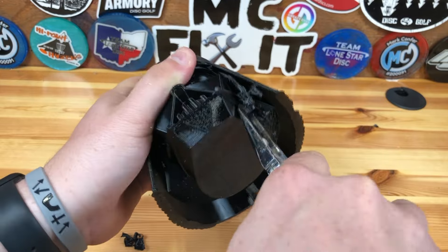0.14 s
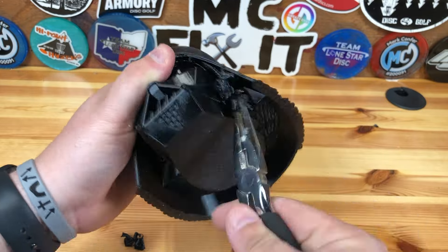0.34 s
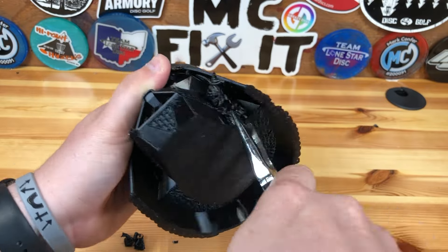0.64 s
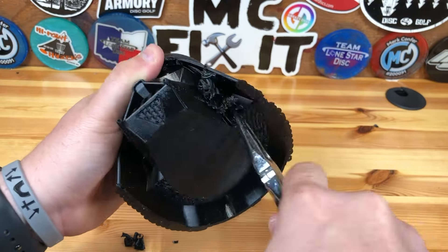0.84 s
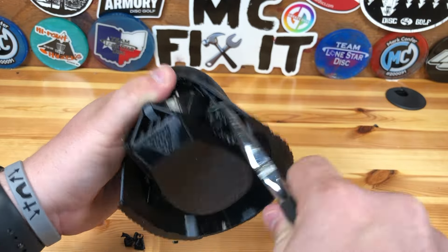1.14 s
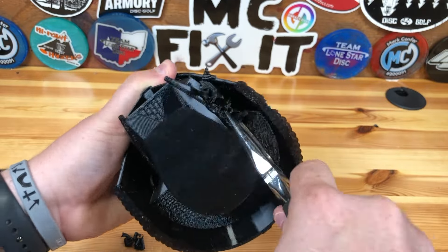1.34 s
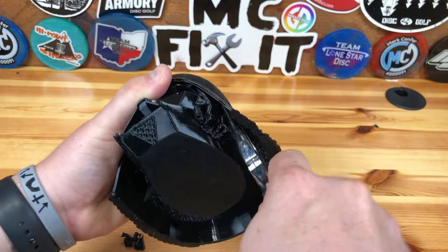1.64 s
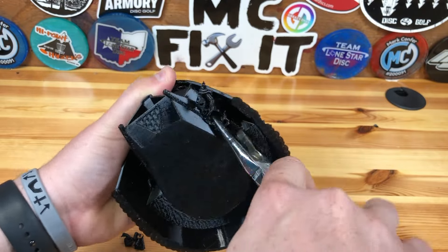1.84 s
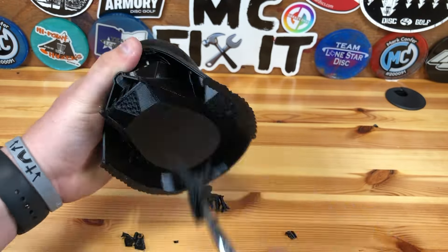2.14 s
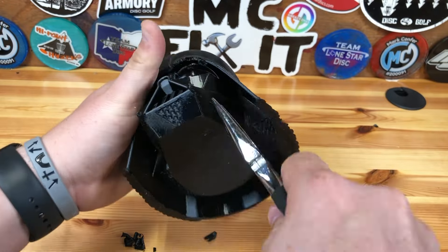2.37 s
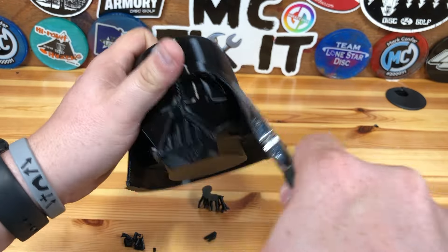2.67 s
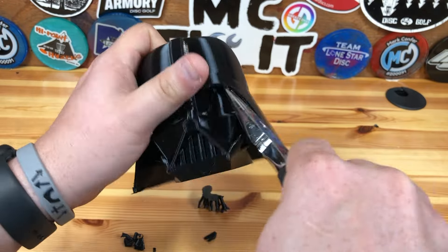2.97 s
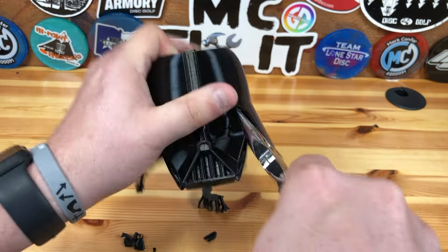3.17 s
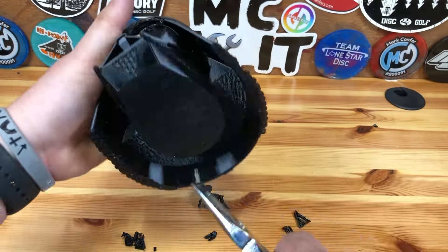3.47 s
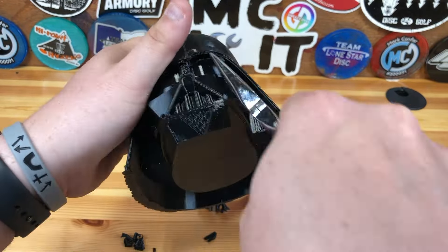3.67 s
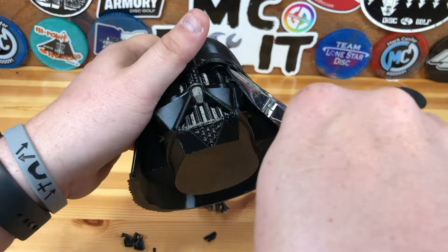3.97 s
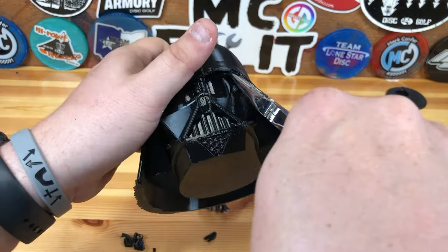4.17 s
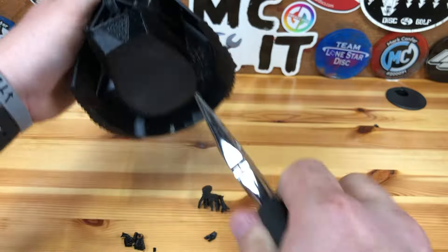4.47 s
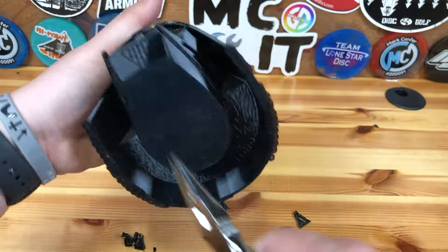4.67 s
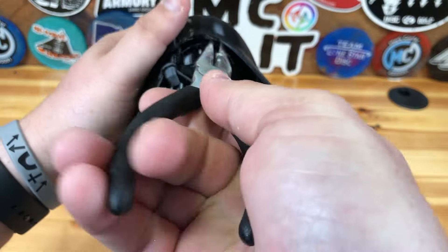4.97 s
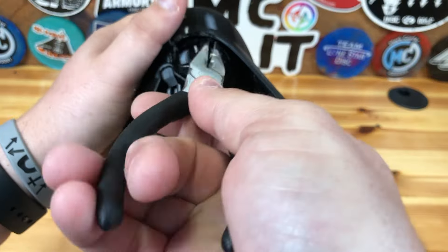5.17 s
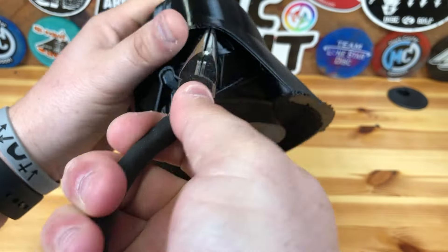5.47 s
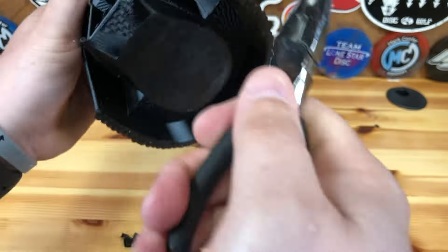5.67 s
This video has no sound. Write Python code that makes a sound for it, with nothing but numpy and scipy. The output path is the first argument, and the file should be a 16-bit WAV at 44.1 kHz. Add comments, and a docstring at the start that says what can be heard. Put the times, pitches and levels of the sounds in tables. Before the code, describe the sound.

Close dry cracks and scrapes of brittle plastic tearing from a hollow shell, dense for two seconds, then quieter knocks and occasional snaps.

```python
"""Pliers snapping supports off a plastic shell

Steel pliers twist and tear thin supports off a hollow 3D-printed plastic shell, held in one hand over a workbench.
Each snap is a short cluster of tiny fractures: they crack directly, ring the shell wall and knock its hollow body.
Between snaps the jaws tap, squeak and scrape over the print layers, bent supports creak and the hand rubs the
shell. Filtered impulses make these sounds; low noise and two wandering sines make the faint hum of a small room."""
import sys
import numpy as np
from scipy import signal
from scipy.fft import rfft, irfft, next_fast_len
from scipy.io import wavfile
from scipy.ndimage import uniform_filter1d, minimum_filter1d, map_coordinates

SR = 44100
rng = np.random.default_rng(int(sys.argv[2]) if len(sys.argv) > 2 else 0)


def bounce(signal):
    """Save signal as a 16-bit WAV file at the path given by the first command-line argument."""
    frames = np.transpose(np.atleast_2d(signal))
    limited = np.clip(frames, -1, 1)
    pcm = np.round(limited * 32767).astype(np.int16)
    wavfile.write(sys.argv[1], SR, pcm)


N = 256662

# Hollow body, damped by the hand. Each row: pitch in Hz, width in Hz, typical level in dB rim up, same face up.
BODY_MODES = [(219, 79.5, 2.5, -1.5), (339.3, 78, 6.5, 2), (483, 213, -0.5, 0), (602, 110, 2, 0.5),
              (782, 120, -6, -1.5), (890, 720, -12.5, -8.5)]
# Shell wall. Each row: pitch in Hz, width in Hz, typical level in dB rim up, same face up.
WALL_MODES = [(1276, 93, -15.5, -25), (1464, 68, -7, -24), (2124, 290, -9.5, -5), (3040, 280, -4, -5),
              (3020, 47, -11.5, -22.5), (4360, 170, -11.5, -12.5)]
# The wall's many heavily damped modes, blended into one smooth spectrum. Each row: frequency in Hz, dB per Hz.
WALL_BLEND = [(500, -32.5), (1100, -18.5), (2300, -17), (3500, -19), (5000, -15), (8000, -33.5),
              (12000, -30.5)]
# Thin support struts. Each row: typical pitch in Hz, width in Hz, relative level in dB.
STRUT_MODES = [(3930, 350, 3.5), (6000, 87, -11), (5620, 460, 2), (7820, 210, -10.5), (7905, 140, 1.5),
               (7950, 160, -10.5), (9280, 110, -18.5), (11370, 110, -3)]
# Spectrum of a fracture. Each row: frequency in Hz, relative dB per Hz.
CRACK_SPECTRUM = [(600, -34), (1500, -26.5), (3000, -3.5), (4500, 0), (8000, 8), (11000, 8), (12500, -3.5),
                  (15000, -37.5)]
# How far the shell is turned over. Each row: time in seconds, position from 0 (rim up) to 1 (face up).
FACE_UP = [(2.1, 0.16), (2.6, 1)]
# Supports breaking. Each row: main break in seconds, relative build-up time, relative die-away time,
# wall ring in dB, crack in dB before its trim, body knock in dB, leading wall pitch in Hz.
SNAPS = [(0.181, 0.0068, 0.0025, -51.5, -46.5, -48.5, 2150),
         (0.2132, 0.0026, 0.0037, -46.5, -38.5, -56.5, 2280),
         (0.2242, 0.0023, 0.0019, -43, -31.5, -60.5, 2120), (0.2337, 0.0028, 0.0024, -44, -44, -61, 2550),
         (0.2421, 0.00078, 0.0022, -49.5, -37, -65, 2730), (0.255, 0.0012, 0.0063, -36.5, -31, -70.5, 2960),
         (0.266, 0.0057, 0.0078, -42.5, -36, -56.0, 2170), (0.3466, 0.00098, 0.001, -52.5, -37, -71, 2660),
         (0.3603, 0.0014, 0.004, -55, -52, -71, 2290), (0.386, 0.0033, 0.0012, -37.0, -34.0, -58.5, 2614),
         (0.4309, 0.0045, 0.0058, -35.5, -32, -66, 2520), (0.4433, 0.0034, 0.0038, -25, -29, -55.5, 2240),
         (0.452, 0.0037, 0.0017, -38, -38.5, -59.5, 2038), (0.555, 0.0033, 0.0011, -56.5, -60, -81, 2640),
         (0.6155, 0.0018, 0.0017, -49, -77, -70.5, 2270), (0.6597, 0.001, 0.0025, -50, -64, -60, 2700),
         (0.6705, 0.0078, 0.0025, -54, -47.0, -51.5, 2500), (0.734, 0.0012, 0.0013, -71, -54.5, -80, 2340),
         (0.8423, 0.0034, 0.0075, -41.0, -36, -44.5, 2280), (0.8551, 0.0022, 0.0055, -39.5, -36, -50, 3100),
         (0.898, 0.0017, 0.0037, -43.5, -47.5, -53.0, 2970),
         (1.0036, 0.00099, 0.0033, -59, -54.5, -74, 2300),
         (1.0462, 0.00082, 0.0038, -62.5, -53, -66.5, 3170), (1.1, 0.0035, 0.0019, -46, -41, -50, 2620),
         (1.112, 0.0037, 0.0038, -30.5, -27.5, -49.5, 2480), (1.1554, 0.0025, 0.007, -29, -42, -61, 2300),
         (1.2879, 0.0016, 0.0037, -53, -56.5, -62.0, 3200), (1.3308, 0.00071, 0.0038, -47, -42, -53, 2390),
         (1.378, 0.00057, 0.0074, -44.5, -43.5, -52.5, 2820),
         (1.397, 0.0017, 0.001, -46.5, -43.0, -59.5, 2300),
         (1.4146, 0.00027, 0.0023, -39.0, -49, -58, 2240),
         (1.4751, 0.0027, 0.0062, -40, -42.5, -50.5, 2170), (1.5065, 0.0081, 0.0037, -37.5, -41, -50, 2260),
         (1.513, 0.0027, 0.0043, -35, -38.5, -53.5, 2950), (1.614, 0.0013, 0.0017, -54, -56, -79, 2330),
         (1.7223, 0.0083, 0.0072, -47, -49.5, -57, 2180),
         (1.8368, 0.0053, 0.005, -49.5, -49.5, -57.5, 2400),
         (1.909, 0.0013, 0.0074, -56.5, -50.5, -58, 2440),
         (1.9717, 0.004, 0.0041, -45.5, -40.0, -51.5, 2420), (1.985, 0.01, 0.0074, -43, -40.5, -63, 2760),
         (2.0329, 0.00038, 0.0055, -38.5, -38, -58.5, 2820),
         (2.0481, 0.0034, 0.0027, -30.5, -37.5, -44.5, 2640),
         (2.0546, 0.0035, 0.0033, -35.5, -32, -55, 3070),
         (2.0684, 0.0028, 0.0084, -30.5, -39.5, -53.0, 2050), (2.0819, 0.0022, 0.0032, -34, -32, -58, 2700),
         (2.274, 0.0013, 0.0024, -61, -52, -75, 2840), (2.667, 0.0012, 0.0077, -54, -53.0, -62.5, 2230),
         (2.6843, 0.0011, 0.001, -58.5, -59, -83, 2340), (2.9207, 0.0039, 0.0061, -63, -60.5, -66, 2230),
         (3.275, 0.0033, 0.011, -58.5, -59, -75, 2250), (3.3137, 0.0016, 0.0094, -51, -48, -59.5, 2320),
         (3.3311, 0.0013, 0.0016, -38.5, -36, -55.5, 2350), (3.7749, 0.0068, 0.0067, -65, -55.5, -82, 2750),
         (4.332, 0.00058, 0.0052, -48.5, -53, -62, 2330), (4.4044, 0.0033, 0.0011, -33.5, -33, -53, 2534),
         (4.409, 0.00054, 0.0072, -52, -56, -47.5, 2540), (4.4821, 0.0025, 0.0035, -59, -60.5, -81, 3200),
         (4.494, 0.0006, 0.0017, -60.5, -56.5, -64.5, 1830),
         (5.6178, 0.0028, 0.002, -51.0, -59.5, -64, 2870), (5.652, 0.0022, 0.008, -71, -60, -90, 3080)]
# Jaws and fingers knocking the shell. Each row: main contact in seconds, relative build-up time,
# body knock in dB before the trim of the taps, wall ring in dB before the same trim, leading wall pitch in Hz.
TAPS = [(0.0144, 0.01, -55.5, -54.5, 2580), (0.081, 0.002, -62.5, -67, 1970),
        (0.697, 0.0043, -49.5, -67, 1740), (1.0174, 0.0012, -63.5, -58, 2130),
        (1.344, 0.0072, -56.5, -44, 2320), (1.7949, 0.0022, -49.5, -78, 1870),
        (2.4025, 0.0018, -49.0, -59.5, 2480), (2.477, 0.00041, -53.5, -59, 2410),
        (2.5384, 0.0071, -55.5, -60.5, 2520), (2.562, 0.0028, -55.5, -59.5, 2140),
        (2.6316, 0.0044, -54.5, -54, 2620), (2.7242, 0.00046, -48, -44, 2640),
        (2.8076, 0.0035, -52.5, -56, 2305), (2.8648, 0.0017, -65.5, -52, 2123),
        (2.8868, 0.0042, -55.5, -71, 2030), (3.1304, 0.002, -54, -47.5, 2430),
        (3.173, 0.0042, -69, -55, 2340), (3.668, 0.0029, -58, -50.5, 2340),
        (3.7217, 0.0011, -58.5, -59.5, 2610), (3.827, 0.0038, -61.5, -62.5, 2400),
        (4.0507, 0.0051, -59.5, -70, 2506), (4.0877, 0.0025, -59, -73, 2250),
        (4.1243, 0.0005, -47.5, -43, 2130), (4.1442, 0.0076, -55, -61.5, 2280),
        (4.1748, 0.0044, -72, -55.5, 2290), (4.8205, 0.0068, -50, -49, 1987),
        (4.8734, 0.0068, -59.5, -57.5, 2020), (4.925, 0.0025, -66, -59.5, 2670),
        (4.9486, 0.0028, -58.5, -55, 2365), (4.9861, 0.0016, -62.0, -58.5, 2010),
        (5.122, 0.001, -67, -63.5, 2360), (5.2, 0.0034, -52, -44.5, 2030),
        (5.2648, 0.0037, -55, -58.5, 2385), (5.3467, 0.0025, -62.5, -71, 2260),
        (5.4227, 0.0039, -59, -60, 2317), (5.6042, 0.0032, -55.5, -53, 3000)]
# Jaws slipping on the wall. Each row: main slip in seconds, relative length, ring level in dB, leading pitch in Hz.
SQUEAKS = [(2.982, 0.0055, -50, 2220), (2.993, 0.0027, -47.5, 2100), (3.036, 0.0083, -43, 2020),
           (3.053, 0.0036, -46, 2040), (3.073, 0.013, -47, 2080), (3.125, 0.0031, -48, 2120),
           (3.955, 0.011, -77, 1830)]
# Bending supports, pitch sinking as they give. Each row: start in seconds, length in seconds, level in dB,
# first pitch in Hz, last pitch in Hz.
CREAKS = [(0.263, 0.049, -62.5, 1900, 1500), (0.59, 0.061, -57.5, 2600, 1430),
          (0.681, 0.024, -61, 3400, 1590), (0.774, 0.012, -62.5, 2200, 1440),
          (1.145, 0.025, -40, 2700, 1650), (1.165, 0.051, -56, 2350, 2112)]
# Strokes of the pliers, the other hand bracing the shell. Each row: start in seconds, length in seconds before
# the release, jaw scrape in dB before its trim, hand rub in dB before its trim.
STROKES = [(0.0, .035, -70.5, -54.5), (0.069, 0.0086, -85, -59), (0.137, 0.054, -61, -76),
           (0.2, 0.095, -45.5, -86), (0.31, 0.11, -47, -75), (0.491, 0.073, -68, -92),
           (0.612, 0.072, -52, -55.5), (0.706, 0.026, -65, -72), (0.753, 0.074, -62, -59),
           (0.864, 0.059, -66, -65), (0.94, .055, -58.5, -81), (1.132, 0.042, -45.5, -63.5),
           (1.199, 0.14, -61.5, -84), (1.311, 0.091, -59, -56.5), (1.482, 0.041, -48, -54.5),
           (1.581, 0.038, -57.5, -87), (1.654, 0.037, -73.5, -81), (1.702, 0.075, -78, -60.5),
           (1.846, 0.021, -48.5, -50.5), (1.887, 0.023, -62, -57), (1.946, 0.045, -50, -50.5),
           (2.014, 0.074, -51, -59), (2.115, 0.022, -60, -97), (2.224, 0.038, -69, -80),
           (2.474, 0.14, -79.5, -65), (2.576, 0.067, -93, -83), (2.725, 0.014, -62.5, -86),
           (2.847, 0.068, -68.5, -60.5), (2.972, 0.11, -61, -66), (3.109, 0.015, -71, -60),
           (3.15, 0.096, -71, -83), (3.364, 0.041, -78.5, -84), (3.653, 0.017, -68, -72),
           (3.74, 0.057, -66, -71), (4.042, 0.17, -85, -69), (4.244, 0.032, -75.5, -70),
           (4.354, 0.066, -59, -69), (4.455, 0.13, -79, -96), (4.799, 0.092, -75.5, -67.5),
           (4.904, 0.065, -74, -65.5), (5.121, 0.02, -68.5, -63.5), (5.189, 0.022, -63.5, -58.5),
           (5.338, 0.11, -81.5, -76.5), (5.598, 0.066, -78.5, -97), (5.707, 0.051, -72.5, -88)]
# Spectrum of the jaws on the print layers. Each row: frequency in Hz, relative dB per Hz.
SCRAPE_SPECTRUM = [(500, -16), (1200, -14), (2300, 3.5), (3500, -3), (6000, -4), (10000, -6), (12500, -18)]
# Spectrum of the shell sliding on skin. Each row: frequency in Hz, relative dB per Hz.
SLIDE_SPECTRUM = [(300, -2.5), (700, -1.5), (1200, 1.5), (1550, 9), (1900, -8), (2500, 6.5), (4500, 0.5),
                  (8000, -6.5), (9500, -0.5), (12000, -10)]
# One dry tick: time in seconds, peak level in dB.
TICK = (5.535, -30)
# Spectrum of the dry tick. Each row: frequency in Hz, relative dB per Hz.
TICK_SPECTRUM = [(200, -34), (800, -7), (1800, -1), (2600, 4.5), (4700, 3.5), (5500, -9.5), (8000, -15.5),
                 (12000, -21)]
# Dull low bumps. Each row: centre in seconds, peak of the envelope in dB, pitch in Hz, envelope length in seconds.
BUMPS = [(0.853, -57.5, 69, 0.011), (2.055, -57.5, 71, 0.0091), (4.403, -63, 95.6, 0.015),
         (5.546, -61.5, 63, 0.055)]
# Room decay. Each row: frequency in Hz, time to fall 60 dB in seconds.
ROOM_DECAY = [(200, 0.34), (1000, 0.067), (4000, 0.1), (12000, 0.047)]
# Spectrum of the room drone. Each row: frequency in Hz, relative dB per Hz.
DRONE_SPECTRUM = [(20, -19), (65, -10), (95, -5.5), (120, -2), (148, 2.5), (175, -4.5), (210, -18),
                  (340, -9.5), (450, -19), (900, -26), (2000, -35), (5000, -42.5), (12000, -47)]
# Faint wandering hum. Each row: centre pitch in Hz, centre level in dB.
HUM_LINES = [(101, -80.5), (148, -82)]

# samples that a tear may run before its main break
LEAD = SR // 50
# the body mode that leads a soft contact, a hard one rim up and a hard one face up
SOFT_KNOCK_HZ, HARD_RIM_UP_HZ, HARD_FACE_UP_HZ = 329, 574, 760
# a contact is hard when its ring exceeds its knock by more than this
HARD_RIM_UP_DB, HARD_FACE_UP_DB = 17, 1.5
# every tap has the same relative die-away time and cracks little against its ring
TAP_FADE, TAP_CRACK_DB = 0.0052, -21
# body knock and crack of a squeak, against its ring
SQUEAK_KNOCK_DB, SQUEAK_CRACK_DB = -19.5, -2.5
# the hand damps the squeaking wall mode within a few milliseconds
SQUEAK_WIDTH_HZ = 130
CREAK_WIDTH_HZ = 290
# times of a stroke's onset, of the jaws lifting off and of the hand settling
STROKE_ATTACK_S, SCRAPE_RELEASE_S, RUB_RELEASE_S = 0.015, 0.015, 0.012
# the hand never rests entirely
RESTING_SCRAPE_DB, RESTING_RUB_DB = -91.5, -80
# the shell slides round in the palm, loudest at first, then catches and stops
TURN_S, TURN_LENGTH_S, TURN_DB, TURN_FADE_DB_PER_S = 2.267, 0.096, -51, 112
TURN_ATTACK_S, TURN_RELEASE_S = 0.0038, 0.032
# limiter ceiling (full scale) and upper band limit
CEILING_DB, TOP_HZ = -17.5, 11850


def amp(db):
    """Decibels to gain."""
    return 10 ** (np.asarray(db) / 20)


def unit(x):
    """Scale to rms 1."""
    return x / np.sqrt(np.mean(x ** 2) + 1e-20)


def along(points, hz):
    """Read (Hz, value) points on a log frequency axis."""
    f, v = np.transpose(points)
    return np.interp(np.log(hz + 1), np.log(f + 1), v)


def wobble(rate):
    """A smooth random curve with rate knots a second."""
    knots = rng.standard_normal(int(N * rate / SR) + 4)
    return map_coordinates(knots, [np.arange(N) * rate / SR])


def filtered(x, response):
    """Pass x through a response given as a function of frequency."""
    n = len(x)
    m = 2 * next_fast_len(n // 2 + 2048)
    f = np.fft.rfftfreq(m, 1 / SR)
    return irfft(rfft(x, m) * response(f), m)[:n]


def resonances(modes, f):
    """Damped modes of (Hz, width in Hz, dB), summed with alternating sign."""
    total = 0
    for k, (centre, width, db) in enumerate(modes):
        damping = 1j * f * width
        total = total + (-1) ** k * amp(db) * damping / (centre * centre - f * f + damping)
    return total


def causal(points, f):
    """Minimum-phase response with the given spectrum: its energy comes as early as it can."""
    cepstrum = irfft(np.log(amp(along(points, f))))
    half = len(cepstrum) // 2
    folded = np.r_[cepstrum[0], 2 * cepstrum[1:half], np.zeros(half)]
    return np.exp(rfft(folded))


def fractures(n, per_second, spread_db):
    """Irregular impulses of random sign and very uneven size."""
    happens = rng.random(n) < per_second / SR
    sign = np.sign(rng.standard_normal(n))
    size = amp(spread_db * np.clip(rng.standard_normal(n), -2, 2))
    return happens * sign * size


def stick_slip(per_second, life, steady):
    """Fine friction grains that come in short bursts, over a little steady friction."""
    catches = np.abs(fractures(N, per_second, spread_db=4))
    bursts = signal.lfilter([1], [1, -np.exp(-1 / (life * SR))], catches)
    return (steady + bursts) * fractures(N, per_second=5000, spread_db=4)


def fracture_cluster(build, fade, main_break, rise=0.97, fall=0.8):
    """Stress runs up through small fractures to the main break, then peters out."""
    t = np.arange(-LEAD, 5 * LEAD) / SR
    time_scale = np.where(t < 0, rise * build, fall * fade)
    progress = t / np.maximum(time_scale, 1e-4)
    # the earliest part is held back, so the tear sets in suddenly
    stress = np.exp(-np.abs(progress)) * np.where(progress < -2, .4, 1)
    cluster = stress * fractures(len(t), per_second=4000, spread_db=3.5)
    cluster[LEAD] += main_break
    return cluster


def held_modes(modes, face_up, vary_db=2):
    """The shell's position and some chance set how strongly each mode answers."""
    return [(hz, width, rim + face_up * (face - rim) + vary_db * rng.standard_normal())
            for hz, width, rim, face in modes]


def leading_mode(hz, width, db, f):
    """One leading mode, a quarter cycle apart from the others."""
    return 1j * resonances([(hz, width, db)], f)


def snap(build, fade, wall_hz, knock_hz, face_up, main_break=1.4, wall_width_hz=230, knock_width_hz=90,
         wall_db=2, body_db=2, strut_db=3):
    """One fracture cluster excites body, wall and struts: knock, ring and crack of equal energy."""
    cluster = fracture_cluster(build, fade, main_break)
    body = held_modes(BODY_MODES, face_up)
    wall = held_modes(WALL_MODES, face_up)
    # the struts are detuned afresh for each contact
    struts = [(hz * np.exp(.04 * rng.standard_normal()), width, db) for hz, width, db in STRUT_MODES]

    def body_response(f):
        """Hollow body modes with one in the lead."""
        return resonances(body, f) + leading_mode(knock_hz, knock_width_hz, body_db, f)

    def wall_response(f):
        """Wall modes and their smooth blend, with one mode in the lead."""
        return resonances(wall, f) + causal(WALL_BLEND, f) + leading_mode(wall_hz, wall_width_hz, wall_db, f)

    def crack_response(f):
        """Direct fracture sound, coloured by the struts."""
        return causal(CRACK_SPECTRUM, f) * (1 + amp(strut_db) * resonances(struts, f))

    parts = [filtered(cluster, response) for response in (body_response, wall_response, crack_response)]
    # rms 1 when the energy is spread over a hundredth of a second
    return np.array([part / np.linalg.norm(part) for part in parts]) * np.sqrt(SR / 100)


def contact(s, build, fade, knock_db, ring_db, crack_db, wall_hz, **shape):
    """One touch on the shell: a hard one wakes a higher body mode than a soft one."""
    face_up = np.interp(s, *np.transpose(FACE_UP))
    hard = ring_db - knock_db > np.interp(face_up, [0, 1], [HARD_RIM_UP_DB, HARD_FACE_UP_DB])
    knock_hz = SOFT_KNOCK_HZ
    if hard:
        knock_hz = np.interp(face_up, [0, 1], [HARD_RIM_UP_HZ, HARD_FACE_UP_HZ])
    return amp([knock_db, ring_db, crack_db]) @ snap(build, fade, wall_hz, knock_hz, face_up, **shape)


def add(out, s, sound):
    """Mix a contact into out with its main break at s seconds."""
    start = round(s * SR) - LEAD
    part = sound[max(-start, 0):N - start]
    out[max(start, 0):][:len(part)] += part


def snaps(crack_trim_db=-1.14):
    """Supports tear and break; levels are rms over a hundredth of a second."""
    out = np.zeros(N)
    for s, build, fade, ring, crack, knock, wall_hz in SNAPS:
        add(out, s, contact(s, build, fade, knock, ring, crack + crack_trim_db, wall_hz, main_break=1.9))
    return out


def taps(trim_db=-2.0):
    """The jaws and fingers knock the shell without breaking anything."""
    out = np.zeros(N)
    for s, build, knock, ring, wall_hz in TAPS:
        tap = contact(s, build, TAP_FADE, knock, ring, ring + TAP_CRACK_DB, wall_hz,
                      main_break=1.3, wall_db=4.0, wall_width_hz=200)
        add(out, s, tap)
    return amp(trim_db) * out


def squeaks():
    """Each slip of the jaws drives one narrow wall mode above the rest."""
    out = np.zeros(N)
    for s, length, db, hz in SQUEAKS:
        squeak = contact(s, length / 2, length / 2, db + SQUEAK_KNOCK_DB, db, db + SQUEAK_CRACK_DB, hz,
                         main_break=0.42, wall_db=6.5, wall_width_hz=SQUEAK_WIDTH_HZ)
        add(out, s, squeak)
    return out


def creaks(count=5):
    """Stick-slip grains ring a resonance that glides down through a few crossfaded steps."""
    out = np.zeros(N)
    t = np.arange(LEAD * 6) / SR
    for start, length, db, first_hz, last_hz in CREAKS:
        progress = np.clip(t / length, 0, 1)
        slips = fractures(len(t), per_second=2500, spread_db=3) * np.sin(np.pi * progress)
        sound = np.zeros(len(t))
        for k, hz in enumerate(np.geomspace(first_hz, last_hz, count)):
            step = np.clip(1 - np.abs(progress * (count - 1) - k), 0, 1)
            sound += filtered(slips * step, lambda f: resonances([(hz, CREAK_WIDTH_HZ, 0)], f))
        # rms 1 when the energy is spread over the creak's length
        sound *= np.sqrt(length * SR) / np.linalg.norm(sound)
        out[round(start * SR):][:len(t)] += amp(db) * sound
    return out


def stroke_level(column, release, resting_db):
    """Attack, hold and release of every stroke, over a faint resting level."""
    t = np.arange(N) / SR
    level = np.full(N, amp(resting_db))
    for (start, length, *_), db in zip(STROKES, column):
        i = max(round(start * SR), 0)
        u = t[i:i + SR // 2] - start
        attack = np.clip(u / STROKE_ATTACK_S, 0, 1)
        level[i:i + SR // 2] += amp(db) * attack * np.exp(-np.maximum(u - length, 0) / release)
    return level


def handling(rub_trim_db=-3.0, scrape_trim_db=-1):
    """Skin slips on the hollow body while the jaws tick across the print layers."""
    _, _, scrape_db, rub_db = np.transpose(STROKES)
    slips = stick_slip(per_second=60, life=.004, steady=.3)
    ticks = stick_slip(per_second=110, life=.002, steady=.26)
    rubbing = unit(filtered(slips, lambda f: resonances([mode[:3] for mode in BODY_MODES], f)))
    scraping = unit(filtered(ticks, lambda f: causal(SCRAPE_SPECTRUM, f)))
    rub_level = stroke_level(rub_db + rub_trim_db, RUB_RELEASE_S, RESTING_RUB_DB)
    scrape_level = stroke_level(scrape_db + scrape_trim_db, SCRAPE_RELEASE_S, RESTING_SCRAPE_DB)
    return rub_level * rubbing + scrape_level * scraping


def turning():
    """The ridged wall rustles across the skin as the shell is turned over."""
    grains = stick_slip(per_second=520, life=.0015, steady=.6)
    rustle = unit(filtered(grains, lambda f: causal(SLIDE_SPECTRUM, f)))
    u = np.clip(np.arange(N) / SR - TURN_S, 0, 1)
    release = np.exp(-np.maximum(u - TURN_LENGTH_S, 0) / TURN_RELEASE_S)
    envelope = np.minimum(u / TURN_ATTACK_S, 1) * release
    return amp(TURN_DB - TURN_FADE_DB_PER_S * u) * envelope * rustle


def tick():
    """A single dry contact: one impulse with a broad spectrum and no ringing mode."""
    s, db = TICK
    impulse = 1. * (np.arange(N) == round(s * SR))
    click = filtered(impulse, lambda f: causal(TICK_SPECTRUM, f))
    return amp(db) * click / np.abs(click).max()


def bumps():
    """Soft low pushes: short sine pulses that swell and fade smoothly."""
    t = np.arange(N) / SR
    out = np.zeros(N)
    for s, db, hz, length in BUMPS:
        envelope = np.exp(-((t - s) / length) ** 2)
        out += amp(db) * envelope * np.sin(2 * np.pi * hz * (t - s))
    return out


def bench_echoes(x, echo_db=-16, count=16):
    """The bench top and the hands throw back weak, early copies."""
    response = np.zeros(SR // 20)
    delays = rng.uniform(.001, .009, count)  # seconds
    response[(delays * SR).astype(int)] = rng.standard_normal(count) * np.exp(-delays / .005)
    return amp(echo_db) * signal.fftconvolve(x, response / np.linalg.norm(response))[:N]


def room(x, wet_db=-26):
    """A short, faint room tail of noise that decays at its own rate in each band."""
    hz, t, z = signal.stft(rng.standard_normal(SR // 3), SR, nperseg=256)
    decay = amp(-60 * t / along(ROOM_DECAY, hz)[:, None])
    tail = signal.istft(z * decay, SR, nperseg=256)[1]
    # the tail waits 5 ms
    response = np.pad(tail / np.linalg.norm(tail), (SR // 200, 0))
    return amp(wet_db) * signal.fftconvolve(x, response)[:N]


def background(drone_db=-70.0, waver=1.7, swell_db=3):
    """Low room drone of shaped noise, with hum lines that wander in phase and level."""
    t = np.arange(N) / SR
    drone = unit(filtered(rng.standard_normal(N), lambda f: amp(along(DRONE_SPECTRUM, f))))
    hum = np.zeros(N)
    for hz, db in HUM_LINES:
        level = amp(db + swell_db * wobble(5.4)) * np.sqrt(2)
        hum += level * np.sin(2 * np.pi * hz * t + waver * wobble(11))
    return amp(drone_db) * drone + hum


def scene():
    """Close plastic sounds, their echoes and the room."""
    work = snaps() + taps() + squeaks() + creaks() + handling() + turning() + tick() + bumps()
    work = work + bench_echoes(work)
    return (work + room(work) + background())[None]


def record(dry):
    """A fast limiter holds the highest peaks, then a steep low-pass closes the top of the band."""
    needed = np.minimum(1, amp(CEILING_DB) / (np.abs(dry) + 1e-9))
    window = SR // 500  # 2 ms
    gain = uniform_filter1d(minimum_filter1d(needed, size=window), size=window)
    return np.array([filtered(x, lambda f: 1 / np.sqrt(1 + (f / TOP_HZ) ** 120)) for x in dry * gain])


dry = scene()
out = record(dry)
bounce(out)
```